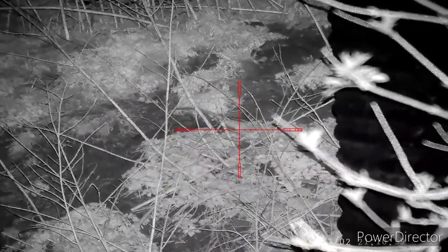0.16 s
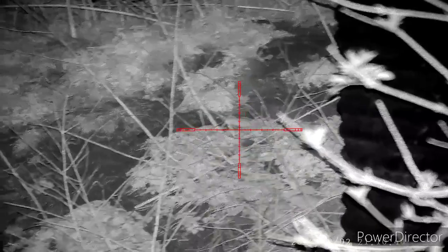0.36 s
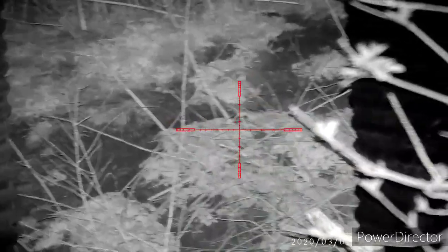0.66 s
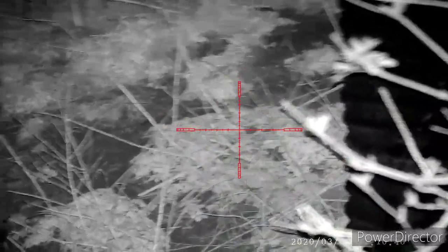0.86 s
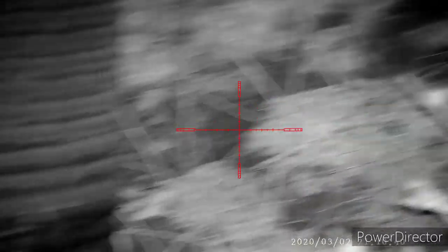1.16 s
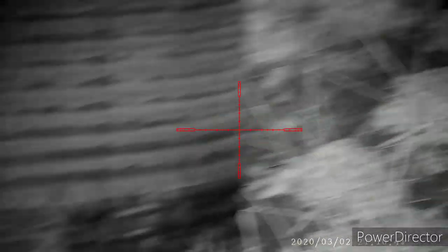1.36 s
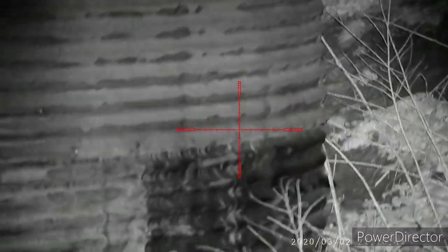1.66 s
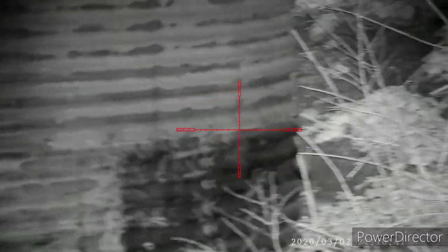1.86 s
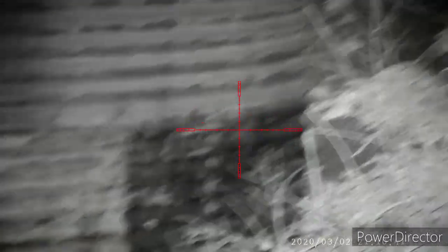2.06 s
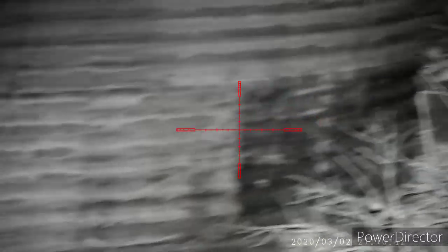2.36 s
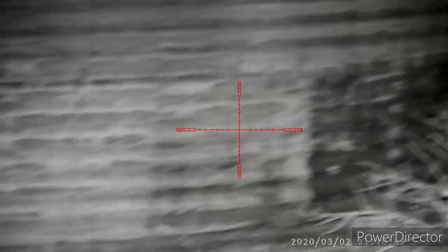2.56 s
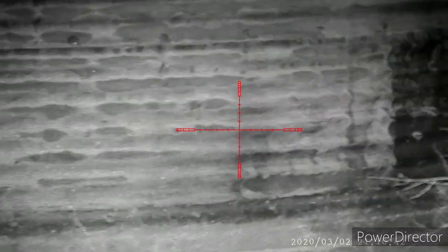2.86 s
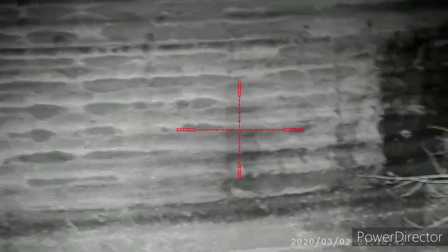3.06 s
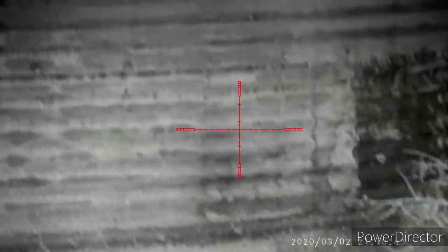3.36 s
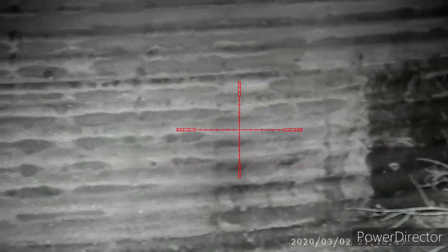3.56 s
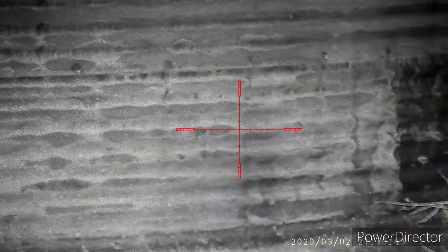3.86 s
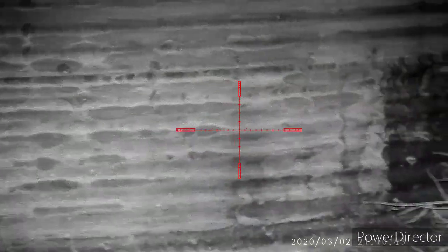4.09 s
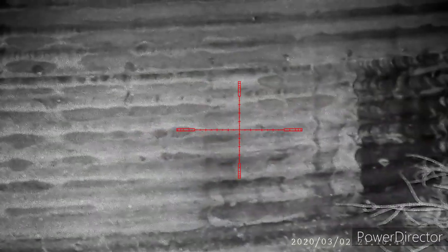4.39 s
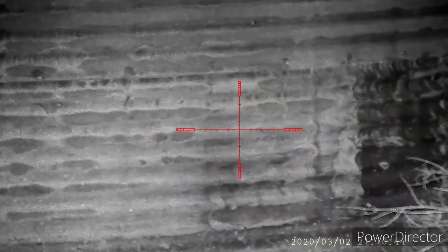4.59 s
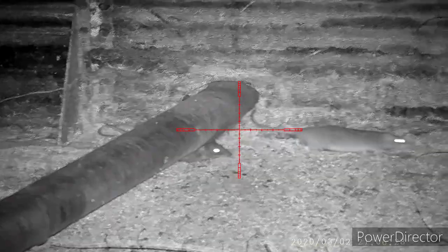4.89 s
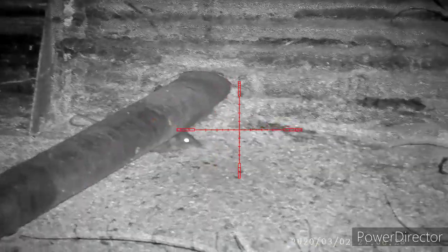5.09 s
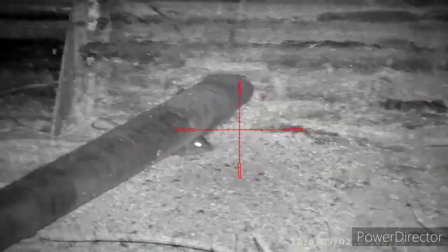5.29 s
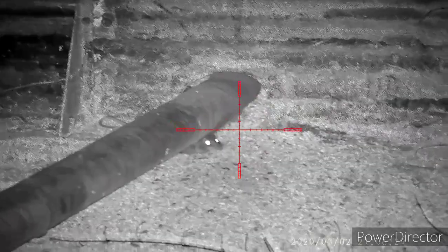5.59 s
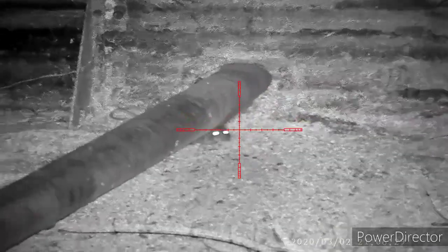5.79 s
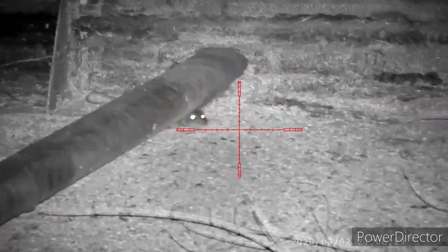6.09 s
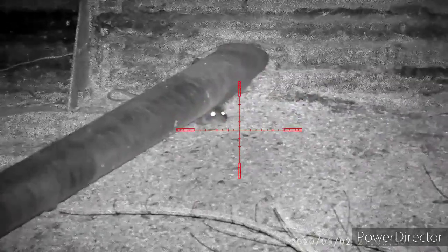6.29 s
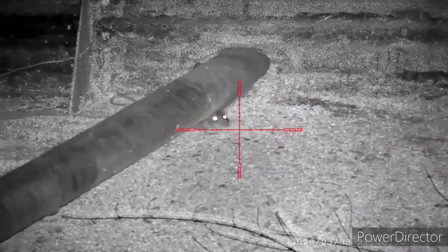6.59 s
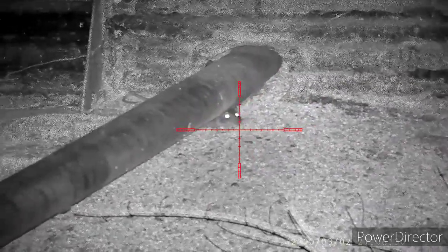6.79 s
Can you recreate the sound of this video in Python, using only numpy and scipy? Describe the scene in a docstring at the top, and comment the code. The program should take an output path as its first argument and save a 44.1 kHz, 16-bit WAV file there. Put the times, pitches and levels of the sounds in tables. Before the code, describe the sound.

A hand rubs and knocks a plastic device housing in a quiet night; its button snaps loudly twice above soft electronic hiss and whine.

```python
"""A still night: a hand-held night-vision scope is swung round; its button snaps twice, springs back and bounces.
Its own microphone hears the plastic housing as decaying modes: fingers tap and knock on it and it creaks.
Shaped noise makes the rubbing and scuffing of skin, most of all during the swing, and the grip's slow flexing.
Under it the electronics hiss (noise) and whine (sines); the sound drops out briefly before the second snap."""
import sys
import numpy as np
from scipy import signal
from scipy.fft import rfft, irfft, next_fast_len
from scipy.io import wavfile
from scipy.ndimage import uniform_filter1d, minimum_filter1d, map_coordinates

SR = 44100
rng = np.random.default_rng(int(sys.argv[2]) if len(sys.argv) > 2 else 0)


def store_wav(level_fs):
    """Save 16-bit WAV to argv[1]."""
    pcm = np.round(np.clip(np.atleast_2d(level_fs), -1, 1) * 32767)
    wavfile.write(sys.argv[1], SR, pcm.T.astype(np.int16))


N = 306304

# modes of the plastic housing, first the flexing of the whole shell: mode_hz, level_db, t60_s
HOUSING_MODES = [(1501, -14, 0.015), (1766, -16, 0.017), (2717, -6, .019), (3460, 0.5, 0.014),
                 (4164, -12.5, 0.018), (4090, -9.5, 0.012), (5210, -3, .013), (5500, -9, .012),
                 (6160, -4.5, 0.012), (6600, -5.5, .006), (7160, -2, 0.014), (8430, -10, 0.013)]


def amp(db):
    """Decibels to gain."""
    return 10 ** (np.asarray(db) / 20)


def unit(x):
    """x at rms 1."""
    return x / np.sqrt(np.mean(x ** 2) + 1e-20)


def clock():
    """The time of every sample, in s."""
    return np.arange(N) / SR


def curves(rows):
    """One value per sample for each column after the time."""
    s, *cols = np.transpose(rows)
    return [np.interp(clock(), s, c) for c in cols]


def wobble(rate_hz):
    """A smooth random curve with rate_hz knots a second."""
    knots = rng.standard_normal(int(N * rate_hz / SR) + 4)
    return map_coordinates(knots, [clock() * rate_hz])


def swells(rows):
    """Sum of Gaussian swells of gain from rows of centre_s, level_db, sigma_s."""
    t = clock()
    return sum(amp(db) * np.exp(-np.minimum(((t - s) / sigma) ** 2, 100) / 2) for s, db, sigma in rows)


def held(start_s, end_s, rise_s, fall_s):
    """An envelope rising exponentially to 1 at start_s, held to end_s, then decaying exponentially."""
    t = clock()
    return np.exp(np.minimum(t - start_s, 0) / rise_s - np.maximum(t - end_s, 0) / fall_s)


def resonance(f, hz, width_hz):
    """The complex response of one mode."""
    return 1j * f * width_hz / (hz * hz - f * f + 1j * f * width_hz)


def filtered(x, response):
    """x times a response of frequency."""
    m = next_fast_len(len(x) + SR // 2)
    spectrum = rfft(x, m) * response(np.fft.rfftfreq(m, 1 / SR))
    return irfft(spectrum, m)[:len(x)]


def noise(colour):
    """Noise of rms 1 with a spectrum drawn through freq_hz, level_db points."""
    f, db = np.transpose(colour)

    def response(hz):
        return amp(np.interp(np.log(hz + 1), np.log(f), db))

    return unit(filtered(rng.standard_normal(N), response))


def add(track, s, sound):
    """Mix a sound into the track at time s."""
    part = track[round(s * SR):][:len(sound)]
    part += sound[:len(part)]


def upper_modes(t, tilt_db):
    """The short ring of the housing above its shell mode, tilted per octave and new at each blow."""
    hz, db, t60 = np.transpose(HOUSING_MODES[1:])[:, :, None]
    size = amp(db + tilt_db * np.log2(hz / hz[0]) + 2 * rng.standard_normal(hz.shape))
    sign = (-1) ** np.arange(len(hz))[:, None]  # neighbouring modes reach the microphone in opposite phase
    ring = sign * size * amp(-60 * t / t60) * np.sin(2 * np.pi * hz * t)
    return np.sum(ring, axis=0) / np.linalg.norm(size)


def strike(shell_db, upper_db, t60_s, contact_hz):
    """One contact on the housing: the shell flexes, the upper modes ring and the contact cracks."""
    t = np.arange(SR // 5) / SR
    hz = HOUSING_MODES[0][0] * (1 + .008 * rng.standard_normal())
    shell = amp(shell_db - 60 * t / t60_s) * (1 - np.exp(-t / 0.0011)) * np.sin(2 * np.pi * hz * t)
    contact = signal.butter(4, contact_hz, fs=SR, output="sos")
    crack = amp(-1 - 60 * t / .007) * signal.sosfilt(contact, rng.standard_normal(len(t)))
    return shell + amp(upper_db - 2.5) * (upper_modes(t, tilt_db=-6) + crack)


def thump(db, build_s):
    """Pressure builds and lets go; the microphone's bass roll-off makes it swing back."""
    release_s = 0.56 * build_s
    t = np.arange(SR // 5) / SR - build_s
    build = np.clip(1 + t / build_s, 0, 1)
    release = (1 + np.cos(np.pi * np.clip(t / release_s, 0, 1))) / 2
    push = amp(db) * build * release
    # the scope rocks in the hand, heavily damped
    rocking = filtered(push, lambda f: resonance(f, 63, 54))
    bass_cut = signal.butter(1, 35, "highpass", fs=SR, output="sos")
    return amp(-4.0) * rocking + amp(-1.5) * signal.sosfilt(bass_cut, push)


def groan(modes, swell_s):
    """Slightly unsteady tones from rows of mode_hz, level_db, t60_s that swell and die."""
    t = np.arange(SR // 3) / SR
    tones = 0
    for hz, db, t60 in modes:
        phase = 2 * np.pi * hz * t + 0.69 * wobble(108)[:len(t)]
        tones = tones + amp(db - 60 * t / t60) * np.sin(phase)
    return tones * (1 - np.exp(-t / swell_s))


def electronics():
    """Two bands of noise hiss and thin sines whine, rising and falling together."""
    # common level of hiss and whine, before their own offsets: time_s, level_db
    floor = [(0.0, -81.5), (0.71, -78.5), (0.85, -76), (1.24, -75.5), (1.41, -72.5), (1.51, -72.5),
             (1.89, -75.5), (2.38, -72.5), (2.59, -72), (3.17, -72.5), (4.08, -79), (4.58, -78.5),
             (4.91, -81), (5.09, -78.5), (5.24, -71.5), (5.45, -77.5), (6.48, -79.5), (6.95, -79.5)]
    # whine: line_hz, level_db
    whine_lines = [(4032.3, 1), (8064.6, -2.5), (12097, -25.5), (12352, -33)]
    # hiss spectra: freq_hz, level_db
    low_hiss = [(12, -28.5), (20, -9), (70, -15.5), (245, -15.5), (279, -16), (479, -18), (595, -19),
                (1090, -23.5), (3500, -35.5), (4550, -67.5), (7700, -120)]
    high_hiss = [(1500, -25), (3500, 1.5), (6000, -0.5), (9000, -1), (11000, -3), (11800, -6), (12500, 1),
                 (13300, -9.5), (15500, -10.5)]
    low_hiss_db, high_hiss_db, whine_db = 18, 7.5, 9  # over the common level

    floor_db, = curves(floor)
    # the hiss and whine stay low during the dropout and for a while after it
    hush_db = -6.5 * held(4.918, 4.918 + .16, rise_s=0.0018, fall_s=.015)
    drift_rad = 0.035 * wobble(15)
    whine = sum(amp(db) * np.sin(2 * np.pi * hz * clock() + drift_rad) for hz, db in whine_lines)
    hiss = amp(low_hiss_db) * noise(low_hiss) + amp(high_hiss_db) * noise(high_hiss)
    return amp(floor_db + hush_db) * (hiss + amp(whine_db) * unit(whine))


def hand():
    """Skin slides over the housing in tiny slips, scuffs it and slowly flexes it."""
    # grips for the swing, for steadying and for the press: start_s, end_s, flexing_db, sliding_db
    grips = [(1.3, 3.37, -37, -67.5), (3.402, 4.894, -57, -82), (5.006, 5.18, -35.5, -90.5)]
    # finger strokes: centre_s, rub_db, sigma_s, scuff_over_rub_db
    strokes = [(0.908, -52.5, .012, -20), (1.275, -54.5, 0.019, 2), (1.369, -52, 0.036, -15),
               (1.572, -49.5, 0.0078, 4), (1.616, -53.5, 0.027, 6), (1.786, -39.5, 0.0087, 8),
               (2.109, -54.5, 0.019, -13), (2.235, -48, 0.021, -17), (2.392, -50, 0.019, 1),
               (2.537, -53.5, 0.018, -5), (2.713, -54, 0.015, -4), (2.97, -53, 0.0049, -12),
               (5.127, -53, 0.0078, 1)]
    # skin drags that set only the shell mode murmuring: centre_s, level_db, sigma_s
    drags = [(.64, -59.5, .03), (.95, -59, 0.038), (1.07, -56, 0.026), (1.168, -54.5, .008),
             (1.36, -59.5, 0.096), (1.61, -50.5, 0.037), (1.895, -56.5, 0.015), (5.33, -67, 0.094),
             (5.76, -67, 0.11), (6.34, -66, 0.051)]
    # spectra of bright rub, dull scuff and grip flexing: freq_hz, level_db
    rub_colour = [(60, -1), (150, 7.5), (1000, -3.5), (1550, 2.5), (2200, -8.5), (3500, -10), (5000, -11.5),
                  (6200, -11), (8500, -21), (13000, -29)]
    scuff_colour = [(60, -11), (200, -4), (600, -6.5), (950, 0.5), (1250, 5), (1550, 4.5), (2000, -27),
                    (4000, -21), (7000, -54), (10000, -54)]
    grip_colour = [(3, -12.5), (7, 5.5), (14, -9.5), (30, -17), (60, -27), (150, -41), (400, -73.5),
                   (1000, -120)]
    tighten_s, relax_s, rest_db = .055, .08, -82  # grip time constants; flexing by the resting hand

    flexing, sliding = amp(rest_db), 0
    for start, end, flexing_db, sliding_db in grips:
        hold = held(start, end, tighten_s, relax_s)
        flexing = flexing + amp(flexing_db) * hold
        sliding = sliding + amp(sliding_db) * hold
    stroking = swells([row[:3] for row in strokes])

    slips = noise(rub_colour) * amp(3 * wobble(400) + 1.5 * wobble(60))

    def damped_housing(f):
        # the fingers widen the resonances
        return sum(amp(db) * t60 * resonance(f, hz, 120) for hz, db, t60 in HOUSING_MODES)

    rub_texture = amp(-3.5) * unit(slips) + amp(-6.5) * unit(filtered(slips, damped_housing))
    rub = (stroking + sliding) * rub_texture

    scuffing = swells([(s, db + scuff_db, sigma) for s, db, sigma, scuff_db in strokes])
    scuffs = scuffing * unit(noise(scuff_colour) * amp(3.1 * wobble(360)))

    drag = swells(drags) + amp(-7) * stroking  # strokes murmur too
    shell_noise = filtered(rng.standard_normal(N), lambda f: resonance(f, 1485, 115) ** 2)
    murmur = drag * unit(shell_noise)

    # slow pressure on the shell under the button
    squeeze = filtered(swells([(5.115, -20, 0.034)]), lambda f: resonance(f, 4.5, 6))
    return rub + scuffs + murmur + squeeze + flexing * noise(grip_colour)


def creaks():
    """Strained plastic gives way in brief groans, and some finger taps ring on with a ping."""
    # creaks: start_s, level_db, pitch_ratio, tilt_db_per_octave, swell_s
    creak_rows = [(.607, -30, 0.92, -27, 0.045), (.888, -28.5, 1, 1, 0.017), (6.038, -43, .81, -6, .01)]
    # pings ringing on after a finger tap: start_s, level_db, swell_s
    ping_rows = [(0.7515, -37, 0.00072), (6.036, -21.5, 0.0033)]
    # modes of the strained casing and of the ping after a tap: mode_hz, level_db, t60_s
    creak_modes = [(147, -2.5, 0.24), (220, 2, 0.12), (313, -6.5, 0.16), (415.5, -1, 0.17),
                   (1498, -6, 0.072), (6080, -13.5, .06)]
    ping_modes = [(1450, -21, .25), (1480, 0, 0.031), (1890, -5, 0.032), (2704, -14.5, 0.022)]

    out = np.zeros(N)
    for s, db, pitch, tilt_db, swell in creak_rows:
        modes = []
        for hz, mode_db, t60 in creak_modes:
            octaves = np.log2(hz / creak_modes[0][0])
            modes.append((pitch * hz, mode_db + tilt_db * octaves, t60))
        add(out, s, amp(db) * groan(modes, swell))
    for s, db, swell in ping_rows:
        add(out, s, amp(db) * groan(ping_modes, swell))
    return out


def taps():
    """Soft fingertips mostly flex the shell; nails also wake the upper modes."""
    # light finger taps: start_s, shell_db, upper_modes_db
    tap_rows = [(0.7515, -38, -30), (1.5067, -50, -38.5), (1.743, -34.5, -48), (1.781, -21, -49),
                (2.059, -54, -45), (2.379, -35.5, -46), (2.537, -38.5, -51), (2.6, -43.5, -65),
                (2.706, -45, -55), (2.9662, -62, -39.5), (3.195, -44, -72), (3.481, -43, -70),
                (3.711, -39, -53), (4.307, -42.5, -56), (4.6432, -43, -58), (4.829, -45.5, -70),
                (6.04, -47, -47)]
    out = np.zeros(N)
    for s, shell_db, upper_db in tap_rows:
        add(out, s, strike(shell_db, upper_db, t60_s=0.051, contact_hz=6200))
    return out


def knocks():
    """The hand lands with a click, damped by its resting on the shell, and pushes the shell in."""
    # knocks of the hand: contact_s, push_db, build_s, click_db
    knock_rows = [(1.091, -38.5, .003, -65), (1.257, -29.5, .011, -59), (1.5587, -29, 0.0018, -37),
                  (1.776, -13.5, 0.0029, -47), (1.7903, -15.5, 0.00084, -28), (1.796, -26, .0022, -31),
                  (1.9624, .5, 0.00595, -14.5), (2.242, -23.5, 0.0045, -53), (2.388, -29.5, 0.0054, -48)]
    out = np.zeros(N)
    for s, push_db, build, click_db in knock_rows:
        click = strike(click_db, click_db - 10.5, t60_s=0.011, contact_hz=5800)
        add(out, s, click + thump(push_db, build))
    return out


def button_return():
    """The button springs back with a bright click and a small thump, and bounces twice, ever weaker."""
    return_s, return_db, bounce_s, bounce_loss_db = 5.1129, -13.5, .0316, 17
    out = np.zeros(N)
    for k in range(3):
        db = return_db - k * bounce_loss_db
        click = strike(db, db - 10.5, t60_s=0.011, contact_hz=10810)
        add(out, return_s + k * bounce_s, click - thump(db - 2.5, build_s=.0009))
    return out


def button():
    """The button snaps over, rings the housing and chatters on its seat."""
    # button snaps: start_s, peak_db, shell_db, push_db, overload_drive_db, ring_tilt_db_per_octave
    snaps = [(3.3263, -1.5, -9.5, -16.5, -15.5, 3), (5.0475, 3, 11, 2, -8, 0)]
    # contacts within one snap: delay_s, level_db
    chatter = [(0, 1.5), (.0007, -14), (.0014, -1), (.0025, -5.5)]

    out, t = np.zeros(N), np.arange(SR // 5) / SR
    shell_hz, shell_db, shell_t60_s = HOUSING_MODES[0]
    treble_cut = signal.ellip(6, .5, 48, 8500, fs=SR, output="sos")
    for s, peak_db, flex_db, push_db, drive_db, tilt_db in snaps:
        shell = amp(shell_db + flex_db - 60 * t / shell_t60_s) * np.sin(2 * np.pi * shell_hz * t)
        age = t / .0008
        push = amp(push_db) * age * np.exp(1 - age)  # pressure pulse
        snap = amp(6.5) * upper_modes(t, tilt_db) + shell - push
        for delay, contact_db in chatter:
            crack = np.diff(rng.standard_normal(len(t) + 1)) * amp(-60 * t / 0.0026)
            add(snap, delay, amp(contact_db + 6.0) * signal.sosfilt(treble_cut, crack))
        # the snap overloads the microphone and carries almost no top treble
        snap = signal.sosfilt(treble_cut, np.tanh(amp(drive_db) * snap))
        add(out, s, amp(peak_db) * snap / np.abs(snap).max())
    return out


def scene():
    """Everything reaches the one microphone."""
    handling = hand() + creaks() + taps() + knocks()
    return (electronics() + handling + button_return() + button())[None]


def record(dry):
    """The sound drops out once, a fast limiter holds the peaks under full scale, and the top is cut off."""
    dropout_s, dropout_length_s, dropout_db, top_hz = 4.918, .029, -56, 15500
    gap_db = dropout_db * held(dropout_s, dropout_s + dropout_length_s, rise_s=0.0011, fall_s=0.00042)
    sound = dry[0] * amp(gap_db)
    needed_gain = np.minimum(1, .98 / (np.abs(sound) + 1e-9))
    gain = uniform_filter1d(minimum_filter1d(needed_gain, size=45), size=45)  # about 1 ms
    return filtered(sound * gain, lambda hz: hz < top_hz)[None]


dry = scene()
out = record(dry)
store_wav(out)
```